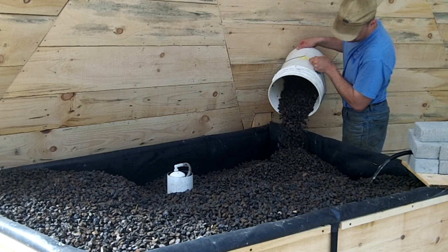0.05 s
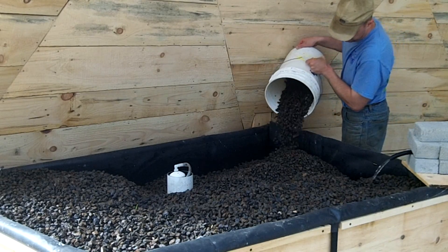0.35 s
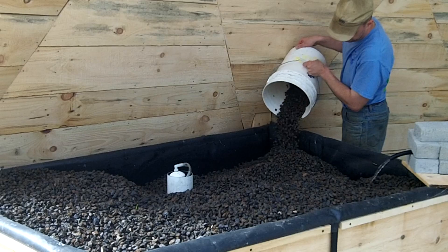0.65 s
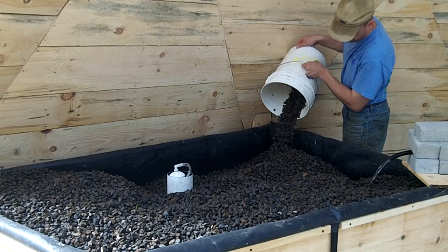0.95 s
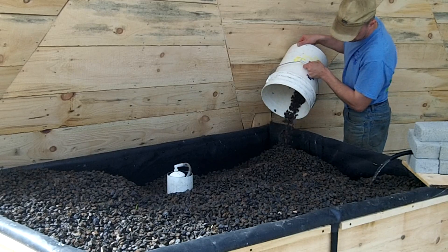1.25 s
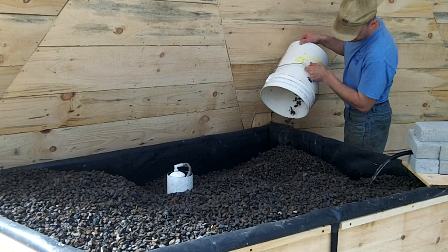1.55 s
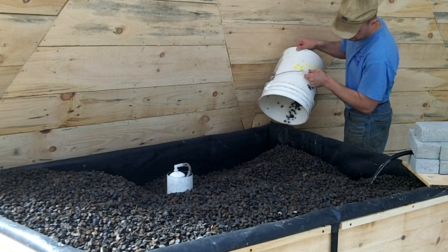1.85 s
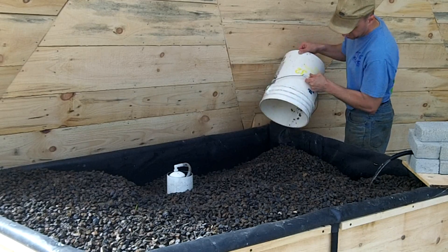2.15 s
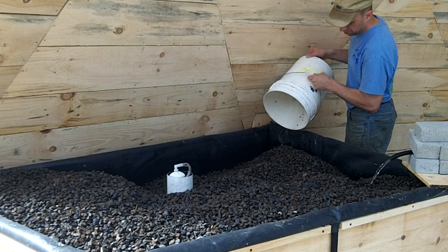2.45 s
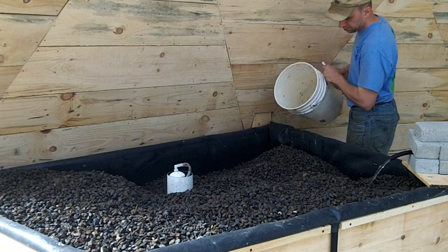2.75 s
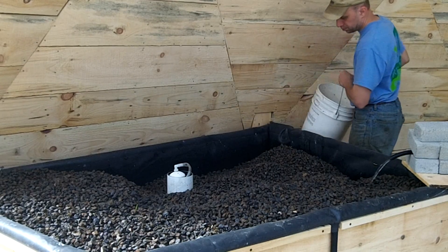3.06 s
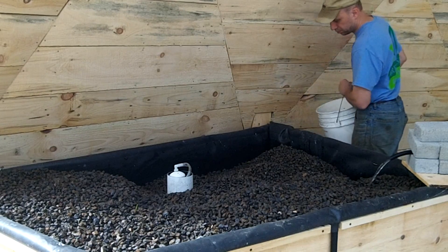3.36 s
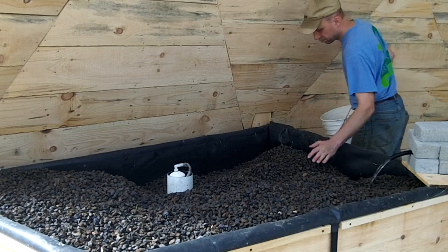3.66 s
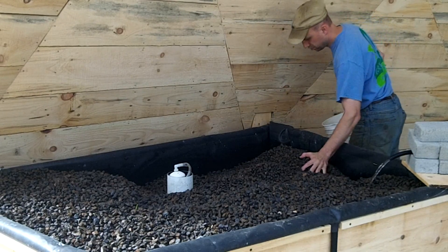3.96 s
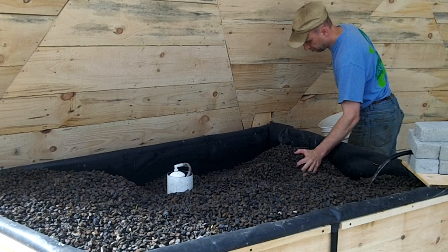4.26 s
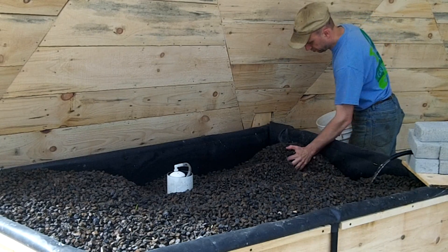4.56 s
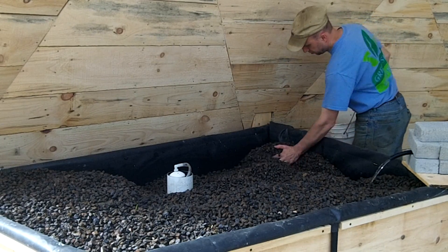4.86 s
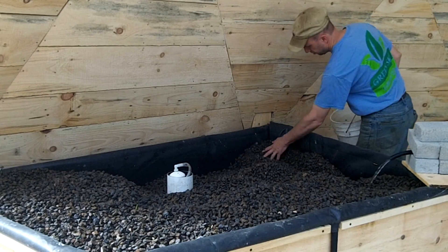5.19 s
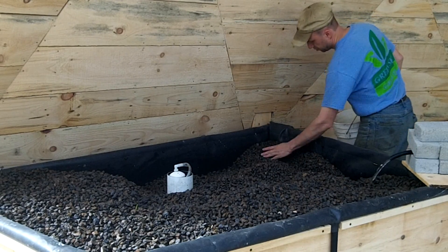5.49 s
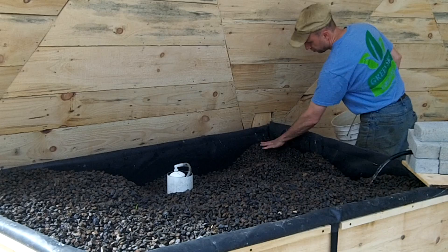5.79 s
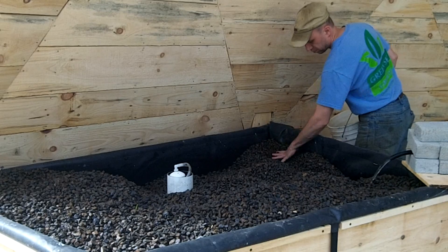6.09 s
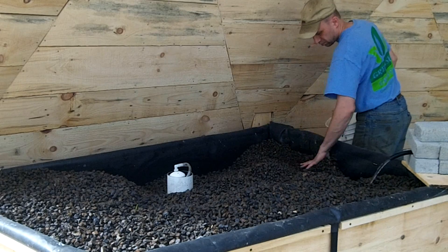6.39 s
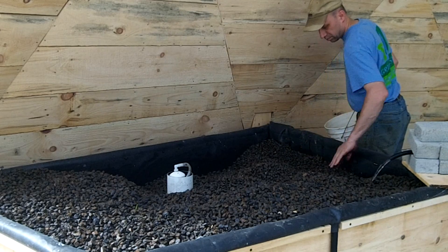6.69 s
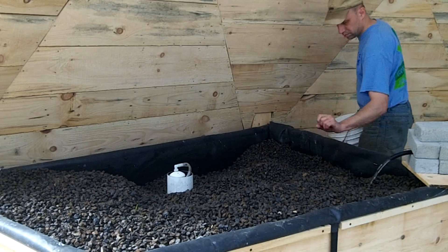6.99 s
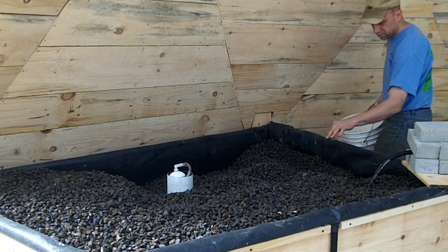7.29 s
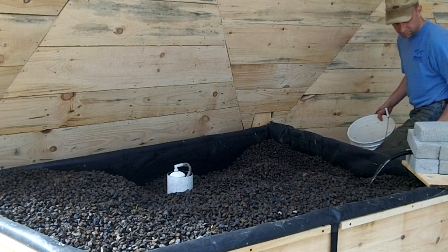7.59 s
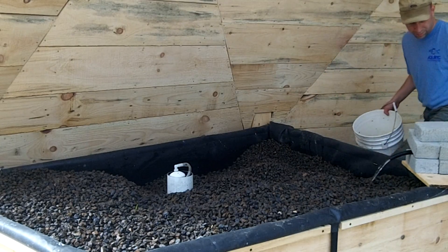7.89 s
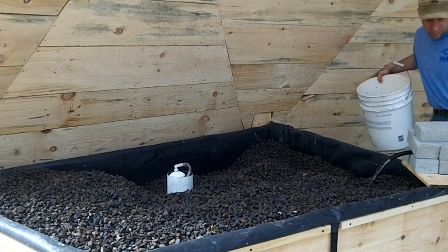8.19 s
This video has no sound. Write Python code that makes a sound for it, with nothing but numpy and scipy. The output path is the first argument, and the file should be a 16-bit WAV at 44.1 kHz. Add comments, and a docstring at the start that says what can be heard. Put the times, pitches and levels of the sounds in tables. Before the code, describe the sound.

A rush of pebbles thins to rattles and knocks in a plastic bucket, followed by gravel raked by hand and a hollow scuff.

```python
"""Small stones pour from a plastic bucket onto a gravel bed in a wood-lined greenhouse, their impacts
driving the modes of the bucket wall. The stream thins, shakes free the last stones, and the empty
bucket, now less damped, is swung down and knocks. A hand spreads the heap in three sweeps, each a
mass of tiny collisions. At the end, as the bucket is carried off, its hollow body scuffs over grit
and resonates, and its wire handle clatters and rings."""
import sys
import numpy as np
from scipy import signal
from scipy.fft import rfft, irfft
from scipy.io import wavfile
from scipy.ndimage import uniform_filter1d

SR = 44100
rng = np.random.default_rng(int(sys.argv[2]) if len(sys.argv) > 2 else 0)


def digitize_waveform(pressure):
    """Quantize a signal to 16-bit integers and store it at the path in sys.argv[1].

    Rows of a 2-D input are taken as channels; values are limited to [-1, 1].
    """
    field = np.atleast_2d(pressure).T
    bounded = np.clip(field, -1, 1)
    quanta = np.round(bounded * 32767).astype(np.int16)
    wavfile.write(sys.argv[1], SR, quanta)


N = 363384
TIME = np.arange(N) / SR
HZ = np.fft.rfftfreq(16384, 1 / SR)

def gain_of(db):
    """Amplitude ratio of a level; all levels here are relative, within their own layer."""
    return 10 ** (np.asarray(db) / 20)

def unit_rms(x):
    """Normalisation to unit mean power."""
    return x / np.sqrt(np.mean(x ** 2) + 1e-20)

def curve_at(points, hz=HZ):
    """Interpolation on a logarithmic frequency axis."""
    f, value = np.transpose(points)
    return np.interp(np.log(hz + 1), np.log(f + 1), value)

def add(mix, start, sound):
    """Superposition: a sound joins the mix at its start time."""
    part = mix[max(round(start * SR), 0):][:len(sound)]
    part += sound[:len(part)]

def after(start):
    """Elapsed time in seconds, zero before the start."""
    return np.maximum(TIME - start, 0)

def envelope(start, rise, end, fade_db_per_s, growth_db_per_s=0):
    """Linear attack, a hold or exponential growth until the end, then exponential decay."""
    attack = np.minimum(after(start) / max(rise, 1 / SR), 1)
    return attack * gain_of(-growth_db_per_s * np.maximum(end - TIME, 0) - fade_db_per_s * after(end))

def power_sum(amplitudes):
    """Incoherent sources add in power."""
    return np.sqrt(sum(amplitude ** 2 for amplitude in amplitudes))

def response(broad, modes=()):
    """Modal response: Lorentzian resonance peaks stand on a broad spectrum."""
    peaks = sum(gain_of(db) ** 2 / (1 + (2 * (HZ - hz) / width) ** 2) for hz, width, db in modes)
    return gain_of(curve_at(broad)) * np.sqrt(1 + peaks)

def in_band(gain, band_hz):
    """Band normalisation: white noise of unit power yields unit power within the band."""
    return gain / np.sqrt(np.mean(gain ** 2 * (HZ > band_hz[0]) * (HZ < band_hz[1])))

def filtered(x, gain):
    """Minimum-phase filtering: folding the cepstrum makes the response causal."""
    cepstrum = irfft(np.log(np.maximum(gain, 1e-5)))
    half = len(cepstrum) // 2
    cepstrum[1:half] *= 2
    cepstrum[half + 1:] = 0
    impulse = irfft(np.exp(rfft(cepstrum)))[:half]
    return signal.oaconvolve(x, impulse)[:len(x)]

def collisions(level, per_s, spread_db, clump_db, ring_s, count=24):
    """Shot noise: random stone clicks in clumps, fewer when the motion is gentle."""
    knots = np.arange(0, TIME[-1], .012)
    clumps = unit_rms(gain_of(clump_db * np.interp(TIME, knots, rng.standard_normal(len(knots)))))
    rate = np.minimum(per_s * (0.027 + level / level.max()), SR)
    size = unit_rms(gain_of(spread_db * np.minimum(rng.exponential(1, N), 4)))
    clicks = (rng.random(N) < rate / SR) * size * clumps * level * np.sqrt(SR / rate)
    # each pebble has its own short, glassy ring; their mean spectrum is flat
    spectra = rfft(rng.standard_normal((count, 256)) * np.exp(-TIME[:256] / ring_s))
    rings = irfft(spectra / np.sqrt(np.mean(abs(spectra) ** 2, axis=0)))
    pebble = rng.integers(0, count, N)
    clicks *= rng.choice([-1, 1], N)
    return sum(signal.oaconvolve(clicks * (pebble == k), rings[k])[:N] for k in range(count))

def impacts(rows, body, contact_s, chatter_db, chatter_s, dulling_db, rise_s=0.00074):
    """Impact excitation: a brief rough contact and a weaker, decaying chatter drive a body."""
    out, t = np.zeros(N), TIME[:SR // 2]
    octaves = np.log2(np.clip(HZ, 400, 10000) / 1500)
    pulse = np.exp(-(t / contact_s) ** 2 / 2) * np.minimum(t / rise_s, 1)
    for start, db, tilt in rows:
        gain = unit_rms(body * gain_of(tilt * octaves))
        contact = filtered(pulse * rng.standard_normal(len(t)), gain)
        rattle = np.exp(-t / chatter_s) * rng.standard_normal(len(t))
        chatter = filtered(rattle, gain * gain_of(-dulling_db * octaves))
        add(out, start, gain_of(db) * (contact + gain_of(chatter_db) * chatter))
    return out

# spectrum of still air: (frequency [Hz], level [dB])
AIR_SPECTRUM = [(25, 0.5), (70, 2.5), (120, 1.5), (250, -1), (600, -3.5), (2000, -5), (3300, -1),
                (5500, -10), (9500, -17.5), (13000, 17.5)]
def air():
    """Stationary noise: the faint ambient floor of the room."""
    return gain_of(-60.5) * filtered(rng.standard_normal(N), in_band(response(AIR_SPECTRUM), (25, 7000)))

# decay of the room: (frequency [Hz], reverberation time [s])
ROOM_T60 = [(150, 0.033), (600, 0.59), (2000, 0.64), (5000, 0.52), (12000, 0.38)]
def echoes(early_db, tail_db, count=24):
    """Reverberation: close plank walls give early reflections, then a short diffuse tail."""
    t = TIME[:SR // 2]
    early = np.zeros(len(t))
    early[(rng.uniform(.0005, .01, count) * SR).astype(int)] = rng.choice([-1, 1], count) / np.sqrt(count)
    taps = rng.choice([-1, 1], len(t)) * (rng.random(len(t)) < .08) * (t > .005)
    hz, age, spectra = signal.stft(taps, SR, nperseg=256)
    decay = gain_of(-60 * age / curve_at(ROOM_T60, hz)[:, None])
    tail = signal.istft(spectra * decay, SR, nperseg=256)[1][:len(t)]
    return gain_of(early_db) * early + gain_of(tail_db) * tail / np.linalg.norm(tail)

def greenhouse(x, early_db, tail_db, count=30):
    """Multipath propagation: the echo paths change as the place of contact moves."""
    place = rng.integers(0, count, N)[np.arange(N) // 600]
    shares = (np.sqrt(abs(uniform_filter1d((place == k) * 1., size=300))) for k in range(count))
    return x + sum(signal.oaconvolve(x * share, echoes(early_db, tail_db))[:N] for share in shares)

# broad response of floor and frame: (frequency [Hz], level [dB])
FLOOR_SPECTRUM = [(30, -16), (60, 5), (130, 4.5), (250, 6), (450, 15.5), (800, 0), (4000, -16)]
# dull bumps of feet and bucket: (time [s], level [dB], resonance [Hz])
FLOOR_BUMPS = [(0.819, -38.5, 62), (0.849, -44, 105), (0.919, -41, 50), (3.154, -32, 215),
               (3.165, -32.5, 105), (3.209, -40, 255), (3.301, -44, 124), (3.612, -39, 235),
               (7.658, -29, 200), (7.729, -29.5, 210)]
def bumps(width_hz=21, peak_db=22.5, push_s=0.04):
    """Damped resonance: each soft push on floor and frame excites one low mode."""
    out, t = np.zeros(N), TIME[:SR // 3]
    for start, db, hz in FLOOR_BUMPS:
        body = unit_rms(response(FLOOR_SPECTRUM, [(hz, width_hz, peak_db)]))
        push = np.exp(-t / push_s) * rng.standard_normal(len(t))
        add(out, start, gain_of(db) * filtered(push, body))
    return gain_of(-14.5) * out

# modes of the wire handle: (frequency [Hz], level [dB], 60 dB decay time [s])
WIRE_MODES = [(1840, -12, 0.17), (1965, -3, 0.45), (2220, -3, 0.36), (2360, -3, 0.27), (2500, -8, .16),
              (3260, -7, .12), (3330, 0, .12), (3840, -2, 0.32), (3860, -1, .26), (4305, -10, .14),
              (4540, -8, .14), (5100, -12, .1), (5500, -6, .12), (6220, -11, .16)]
# the handle swings against the bucket: (time [s], level [dB], centre of excitation [Hz])
WIRE_HITS = [(7.574, -35, 3900), (7.666, -31, 2200), (7.889, -37, 3100)]
def handle(span_octaves=.7, rise_s=.003):
    """Free vibration of a struck wire: the striking point selects the modes that sound."""
    out, t = np.zeros(N), TIME[:SR // 2]
    hz, mode_db, t60 = np.transpose(WIRE_MODES)[:, :, None]
    for start, db, centre_hz in WIRE_HITS:
        excited = np.exp(-(np.log2(hz / centre_hz) / span_octaves) ** 2 / 2)
        phase = 2 * np.pi * (hz * t + rng.random(hz.shape))
        modes = excited * gain_of(mode_db - 60 * t / t60) * np.sin(phase)
        add(out, start, gain_of(db) * np.minimum(t / rise_s, 1) * modes.sum(0))
    return out

# tones of a hollow wall: (time [s], rise [s], duration [s], frequency [Hz], level [dB], decay [dB/s])
WALL_TONES = [(3.641, .025, 0.037, 798, -43.5, 190), (3.663, 0.013, 0.017, 470, -42, 415),
              (3.8, .025, 0.025, 470, -58, 132), (7.734, 0.036, 0.065, 533, -43, 200),
              (7.733, .05, 0.095, 780, -46, 150), (7.76, 0.036, 0.21, 820, -46, 24),
              (7.93, 0.075, 0.38, 608, -46.5, 40), (8.12, 0.033, 0.039, 1135, -42.5, 200)]
def hollow_rings(linewidth_hz=2.6):
    """Narrowband resonance: single modes swell and die, their pitch unsteady through phase diffusion."""
    out = np.zeros(N)
    for start, rise, length, hz, db, fade in WALL_TONES:
        drift = np.cumsum(rng.standard_normal(N)) * np.sqrt(2 * np.pi * linewidth_hz / SR)
        tone = np.sqrt(2) * np.sin(2 * np.pi * hz * TIME + drift)
        out += gain_of(db) * envelope(start, rise, start + length, fade) * tone
    return out

# grit catches under the bucket: (time [s], duration [s], level [dB], decay [dB/s])
GRIT_CATCHES = [(3.61, 0.026, -43, 230), (7.577, 0.02, -36.5, 302), (7.657, 0.015, -32.5, 49),
                (7.893, .012, -53, 250), (7.94, 0.02, -34, 81)]
# pushes that drag the body: (time [s], rise [s], duration [s], level [dB], decay [dB/s])
DRAG_PUSHES = [(7.595, 0.1, 0.52, -38, 28), (7.736, 0.055, 0.073, -33, 115),
               (7.918, 0.03, 0.082, -42.5, 55)]
def dragging(touch_s=7.572):
    """Frictional drive: envelopes of catching grit, and of the body as it is touched, then dragged."""
    catches = [gain_of(db) * envelope(s, .005, s + length, fade) for s, length, db, fade in GRIT_CATCHES]
    touch = gain_of(-35) * envelope(touch_s, 0.003, touch_s, fade_db_per_s=127)
    drags = [gain_of(db) * envelope(start, rise, start + length, fade)
             for start, rise, length, db, fade in DRAG_PUSHES]
    return power_sum(catches), power_sum([touch] + drags)

# broad responses of the grit and the hollow body: (frequency [Hz], level [dB])
GRIT_SPECTRUM = [(100, -15), (600, -28), (1500, -2), (2800, 3.5), (4200, -1), (5800, -5), (9500, -31.5),
                 (14000, -4)]
BODY_SPECTRUM = [(60, -30), (200, -13), (350, -15.5), (500, -10), (750, -3), (1200, -3), (2000, -4),
                 (3500, -14.5), (8000, -42)]
# modes of the hollow body: (frequency [Hz], bandwidth [Hz], prominence [dB])
BODY_MODES = [(216, 33, 4.1), (534, 15, 12.6), (608, 12, 9), (780, 39, 5.3), (820, 25, 4.5), (902, 8.1, 8),
              (1140, 13, 4.7), (1200, 29, 4.3), (1737, 12, 8.6), (3500, 200, 4.1)]
# the body catches and jolts: (time [s], level [dB], tilt [dB/octave])
BODY_JOLTS = [(7.664, -16, 4.5), (7.775, -26, -4), (7.807, -18, -0.5), (7.828, -25, 3), (7.889, -23, -4),
              (8.046, -16, 2.5), (8.13, -17.5, 2)]
def scuff():
    """Stick-slip friction: grit catches, slips and sets the hollow body ringing."""
    grinding, ringing = dragging()
    grit = in_band(response(GRIT_SPECTRUM), (3000, 7000))
    body = in_band(response(BODY_SPECTRUM, BODY_MODES), (450, 1300))
    crunch = filtered(collisions(grinding, per_s=9000, spread_db=3.5, clump_db=1.5, ring_s=0.00045), grit)
    groan = filtered(collisions(ringing, per_s=5000, spread_db=0, clump_db=2.7, ring_s=0.0014), body)
    jolts = impacts(BODY_JOLTS, body, contact_s=0.011, chatter_db=-10, chatter_s=0.037, dulling_db=-3)
    return gain_of(-4) * crunch + gain_of(-2.5) * groan + gain_of(-15) * jolts

# broad response of the empty bucket: (frequency [Hz], level [dB])
EMPTY_SPECTRUM = [(60, -40), (200, -36), (320, -30), (500, -23), (750, -9.5), (1100, -5.5), (1800, 0.5),
                  (3000, -5), (5000, -6.5), (12000, -42)]
# its freely ringing modes: (frequency [Hz], bandwidth [Hz], prominence [dB])
EMPTY_WALL_MODES = [(238, 16, 15.5), (465, 21, 19), (798, 15, 11), (950, 36, 10), (1050, 41, 12),
                    (1480, 30, 7), (1630, 70, 2), (1727, 32, 8.5), (2180, 60, 6)]
EMPTY_WALL = in_band(response(EMPTY_SPECTRUM, EMPTY_WALL_MODES), (800, 2200))
# rubs on the bucket: (time [s], rise [s], duration [s], level [dB])
WALL_RUBS = [(3.01, 0.074, 0.055, -56), (3.119, 0.029, 0.077, -49), (3.29, 0.16, 0.34, -50)]
def rubbing():
    """Forced vibration: light friction drives the empty bucket as it is turned and lowered."""
    turning = power_sum(gain_of(db) * envelope(start, rise, start + length, fade_db_per_s=59)
                        for start, rise, length, db in WALL_RUBS)
    friction = collisions(turning, per_s=1700, spread_db=2, clump_db=2, ring_s=0.0027)
    return gain_of(-4.5) * filtered(friction, EMPTY_WALL)

# spectrum of a hard contact: (frequency [Hz], level [dB])
CLACK_SPECTRUM = [(100, -35), (500, -43), (1000, 2), (2000, 14.5), (3800, 18.5), (6000, 16), (9500, -3),
                  (14000, 13)]
# clacks of stones and handle: (time [s], level [dB], tilt [dB/octave], contact time [s])
HARD_CLACKS = [(1.863, -24, -2, 0.0034), (2.19, -20, 15, 0.0046), (3.2742, -36, -13.5, 0.0046),
               (3.369, -32.5, -4.5, 0.0056), (3.419, -40, 0, 0.0058), (3.4258, -34.5, -3, 0.0045),
               (3.451, -40, -3, .004), (3.468, -34.5, -5, 0.0036), (3.617, -29.5, -16, 0.0026),
               (3.635, -34.5, -3.5, .003), (5.8077, -31.5, 6.5, .008), (5.819, -26.5, 5.5, 0.024),
               (6.008, -41, -4, .008), (6.048, -31, 7, 0.0093), (6.061, -28.5, 5, 0.0096),
               (6.1698, -41, -7, 0.016), (6.2315, -24.5, 11, .0018), (7.5743, -27.5, 3, 0.016),
               (7.668, -30.5, -11, .01), (7.8894, -23, -3, 0.0081)]
def clacks():
    """Hard impact: stones and handle make brief contacts that radiate mostly treble."""
    hard = response(CLACK_SPECTRUM)
    return sum(impacts([(s, db, tilt)], hard, contact, chatter_db=-21, chatter_s=0.0099, dulling_db=7)
               for s, db, tilt, contact in HARD_CLACKS)

# spectrum of one pebble: (frequency [Hz], level [dB])
PEBBLE_SPECTRUM = [(200, -25), (800, -14.5), (1700, -0.5), (4000, 2.5), (6000, 1), (9500, -15),
                   (14000, -1.5)]
# the last stones land: (time [s], level [dB], tilt [dB/octave])
PEBBLE_TICKS = [(2.623, -34.5, 8), (2.679, -30.5, 5), (2.73, -48.5, -4), (2.752, -45, -1.5),
                (2.786, -47.5, -5), (2.848, -39, 12), (2.874, -49, 2), (2.934, -53, 9), (2.951, -42, 10),
                (2.984, -49, 0), (7.055, -39.5, 15)]
def ticks():
    """Isolated transients: stones strike the heap one by one."""
    pebble = response(PEBBLE_SPECTRUM)
    return impacts(PEBBLE_TICKS, pebble, contact_s=0.0061, chatter_db=-16, chatter_s=0.01, dulling_db=4)

# broad response of the bucket with stones in it: (frequency [Hz], level [dB])
LOADED_SPECTRUM = [(60, -38), (200, -39), (320, -34), (450, -19.5), (700, -16.5), (1000, -7.5),
                   (1500, -5.5), (2100, -2.5), (3000, -4.5), (5000, -9), (12000, -33.5)]
# its modes under a light load: (frequency [Hz], bandwidth [Hz], prominence [dB])
LIGHT_WALL_MODES = [(260, 44, 13.5), (468.6, 21, 16), (830, 49, 6), (953, 19, 14), (1080, 11, 11.5),
                    (1396, 78, 9.5), (1494, 89, 5), (1620, 90, 6.5), (1700, 150, 0.5), (2215, 40, 4)]
LIGHT_WALL = in_band(response(LOADED_SPECTRUM, LIGHT_WALL_MODES), (800, 2200))
# knocks on the wall: (time [s], level [dB], tilt [dB/octave])
WALL_KNOCKS = [(1.226, -13, -2), (1.511, -10.5, -2.5), (1.549, -23, -4), (1.714, -12.5, -0.5),
               (1.849, -10, -0.5), (1.877, -12, 0.5), (1.897, -12.5, -2), (1.942, -13, 0), (1.964, -15, -5),
               (1.977, -19, -5), (2.07, -11, 0.5), (2.09, -11.5, 5.5), (2.108, -12, 4),
               (2.122, -14.5, -1.5), (2.231, -9.5, 0.5), (2.252, -19, -1), (2.263, -10.5, -0.5),
               (2.282, -18, 4), (2.311, -16, 8), (2.358, -14, 0.5), (2.376, -11, 2), (2.402, -7.5, -2.5),
               (2.411, -11.5, 2.5), (2.449, -11, 3.5), (2.467, -12.5, 2.5), (3.005, -33, -12),
               (3.061, -31.5, 0.5), (3.274, -36, -2.5), (3.317, -34, -3), (3.4, -38, -9.5), (3.542, -29, 2),
               (3.6, -34, 8), (3.6158, -12, -5.5), (3.892, -32.5, -1.5)]
def knocks(empty_s=2.9):
    """Contact damping: stones deaden the struck wall, which rings longer once they have left."""
    early = [knock for knock in WALL_KNOCKS if knock[0] < empty_s]
    late = [knock for knock in WALL_KNOCKS if knock[0] >= empty_s]
    damped = impacts(early, LIGHT_WALL, contact_s=0.0054, chatter_db=-14, chatter_s=0.015, dulling_db=2)
    ringing = impacts(late, EMPTY_WALL, contact_s=0.0048, chatter_db=-12, chatter_s=0.097, dulling_db=1.5)
    return gain_of(-16.5) * damped + gain_of(-13.5) * ringing

# hand strokes: (time [s], rise [s], duration [s], surface level [dB], deep level [dB], grit level [dB])
HAND_STROKES = [(3.943, 0.036, 0.11, -37.5, -59.5, -67), (4.044, 0.16, 0.32, -36, -53.5, -68.5),
                (4.401, 0.15, 0.9, -33.5, -41, -64), (5.492, 0.026, 0.19, -52.5, -88, -74),
                (5.794, 0.042, 0.036, -34, -42.5, -59), (6.033, 0.017, 0.024, -42.5, -52, -70.5),
                (6.246, 0.11, 0.46, -36, -44.5, -58), (6.782, 0.06, 0.068, -42, -62, -65)]
def raking(rest_db_per_s=79, deep_lag_s=0.052):
    """Granular shear: as the hand sinks in, deep stones and grit move more; deep stones stop last."""
    surface, deep, grit = [], [], []
    for start, rise, length, surface_db, deep_db, grit_db in HAND_STROKES:
        end = start + length
        surface.append(gain_of(surface_db) * envelope(start, rise, end, rest_db_per_s))
        digging = envelope(start, rise, end + deep_lag_s, rest_db_per_s, growth_db_per_s=21.5)
        deep.append(gain_of(deep_db) * digging)
        grit.append(gain_of(grit_db) * envelope(start, rise, end, rest_db_per_s, growth_db_per_s=2.5))
    return power_sum(surface), power_sum(deep), power_sum(grit)

# spectra of top stones, buried stones and fine grit: (frequency [Hz], level [dB])
SURFACE_SPECTRUM = [(100, -23.5), (500, -17), (1000, -17.5), (1500, -10.5), (3000, -3.5), (4400, -2.1),
                    (6000, -3), (9500, -26), (14000, -26)]
DEEP_SPECTRUM = [(35, -40), (70, -15), (120, -8), (190, 1), (300, 1), (430, 0.5), (700, -3.5), (1100, -1.5),
                 (2000, -16.5), (6000, -24)]
FINES_SPECTRUM = [(1500, -7), (3000, -4.5), (5200, 6), (6600, 4.5), (9000, -5), (14000, 15.5)]
def hand():
    """Absorption with depth: raked top stones and grit sound bright, while the bed muffles deep ones."""
    sliding, shoving, sifting = raking()
    surface = in_band(response(SURFACE_SPECTRUM), (2500, 7000))
    deep = in_band(response(DEEP_SPECTRUM), (130, 900))
    fines = response(FINES_SPECTRUM)
    rush = filtered(collisions(sliding, per_s=18000, spread_db=2, clump_db=-0.1, ring_s=0.0011), surface)
    rumble = filtered(collisions(shoving, per_s=9000, spread_db=1, clump_db=.5, ring_s=0.0004), deep)
    hiss = filtered(collisions(sifting, per_s=7300, spread_db=-2, clump_db=4.9, ring_s=0.00053), fines)
    return gain_of(-0.8) * rush + gain_of(-2.5) * rumble + gain_of(23.5) * hiss

# shakes rattle the last stones along the wall: (time [s], duration [s], level [dB])
BUCKET_SHAKES = [(1.587, 0.072, -34), (1.844, 0.18, -36), (2.058, 0.066, -32), (2.212, 0.049, -32.5),
                 (2.343, 0.026, -35.5), (2.454, 0.022, -36.5)]
def flow(thins_s=1.393, stops_s=1.9, strays_end_s=3.1):
    """Granular discharge: envelopes on heap and wall of a stream that runs evenly, thins and stops."""
    settling_db = 46 * after(stops_s)
    landing = [gain_of(-32 - 17.5 * after(thins_s) - settling_db)]
    drumming = [gain_of(-34 - 19.5 * after(thins_s) - settling_db)]
    for start, length, db in BUCKET_SHAKES:
        rattle = gain_of(db) * envelope(start, 0.0057, start + length, fade_db_per_s=505)
        # a trickle then slides down the wall and falls on the heap
        trickle = gain_of(db) * envelope(start, 0.064, start + length, fade_db_per_s=66)
        drumming += [rattle, gain_of(-5.5) * trickle]
        landing.append(gain_of(-7) * trickle)
    strays = gain_of(-59.5 - 72 * after(strays_end_s))  # stones rolling down the heap
    return power_sum(landing + [strays]), power_sum(drumming)

# spectrum of stones landing on the heap: (frequency [Hz], level [dB])
HEAP_SPECTRUM = [(60, -22.5), (250, -19.5), (600, -8), (1200, -1), (3000, -1), (5800, 1.5), (9500, -11.5),
                 (14000, 10.5)]
# modes of the fully loaded wall: (frequency [Hz], bandwidth [Hz], prominence [dB])
FULL_WALL_MODES = [(235, 38, 23.5), (300, 50, 16), (470, 140, 10), (780, 86, 4), (980, 104, 10),
                   (1335, 20, 17), (1423, 32, 9), (1535, 30, 10), (1630, 74, 3), (2150, 270, -2)]
def pour(unload_start_s=0.41, unload_length_s=1.04):
    """Mass loading: stones drum along a wall whose modes change as it unloads, then land on the heap."""
    landing, drumming = flow()
    heap = in_band(response(HEAP_SPECTRUM), (3500, 7000))
    full_wall = in_band(response(LOADED_SPECTRUM, FULL_WALL_MODES), (800, 2200))
    stones = filtered(collisions(landing, per_s=22000, spread_db=1.7, clump_db=1.8, ring_s=0.00043), heap)
    taps = collisions(drumming, per_s=9000, spread_db=0.4, clump_db=0.1, ring_s=0.00038)
    unloaded = np.minimum(after(unload_start_s) / unload_length_s, 1)
    drum = (1 - unloaded) * filtered(taps, full_wall) + unloaded * filtered(taps, LIGHT_WALL)
    return gain_of(-5.5) * stones + gain_of(-3) * drum

def scene():
    """Superposition of direct and reflected sound over still air, alike in both channels."""
    hits = gain_of(0.5) * (clacks() + ticks()) + knocks()
    thuds, ambience = bumps(), air()
    sources = pour() + rubbing() + hand() + scuff() + hits + thuds
    room = greenhouse(sources, early_db=-8.5, tail_db=-4.5)
    direct = gain_of(-27) * hits  # hits in the open arrive more directly than sound from the bed
    mono = room + direct + hollow_rings() + handle() + ambience
    return np.array([mono, mono])

# sensitivity of a small microphone: (frequency [Hz], level [dB])
MIC_RESPONSE = [(5800, -1), (7000, -2), (9600, -3), (11000, -18.5), (12500, -29.5), (14500, -38)]
def record(dry, notch_hz=7880, notch_half_width_hz=340, cutoff_hz=15250):
    """Transducer response: a small microphone with dull treble, one deep notch and a band limit."""
    notch = (HZ - notch_hz) ** 2 / ((HZ - notch_hz) ** 2 + notch_half_width_hz ** 2)
    microphone = response(MIC_RESPONSE) * notch
    lowpass = signal.firwin(511, cutoff_hz, window=("kaiser", 9), fs=SR)
    return np.array([signal.oaconvolve(filtered(x, microphone), lowpass, "same") for x in dry])

dry = scene()
out = record(dry)
digitize_waveform(out)
```